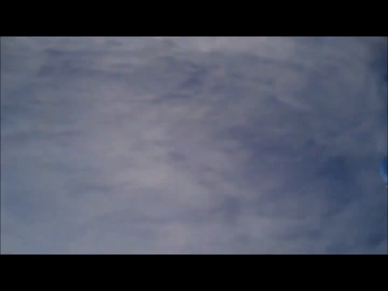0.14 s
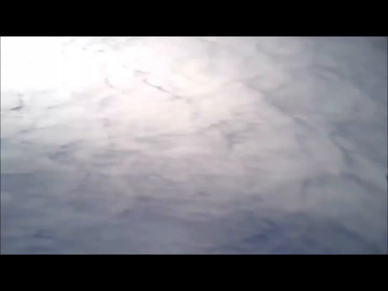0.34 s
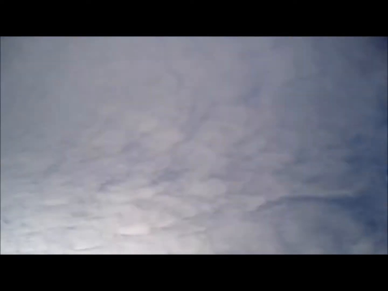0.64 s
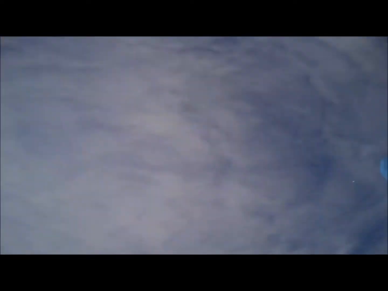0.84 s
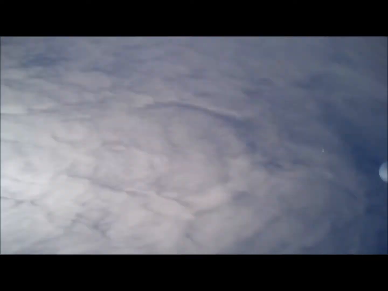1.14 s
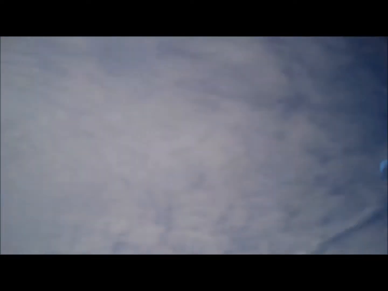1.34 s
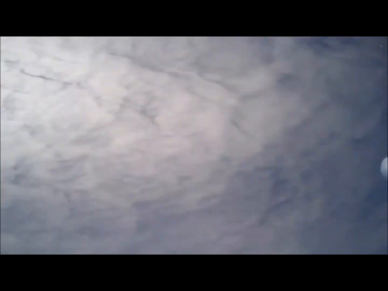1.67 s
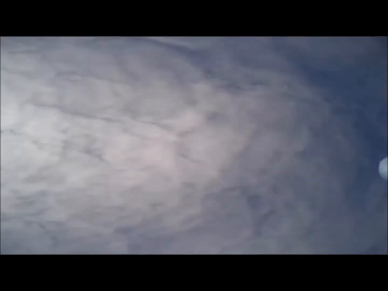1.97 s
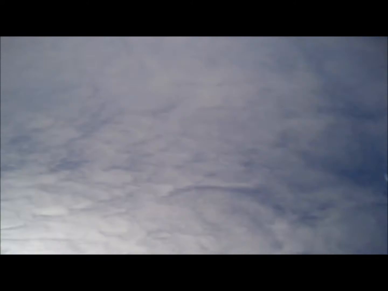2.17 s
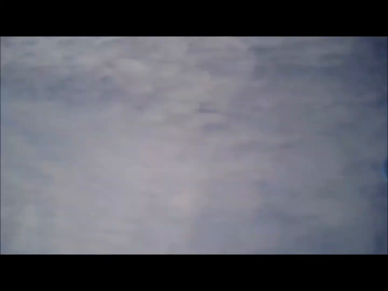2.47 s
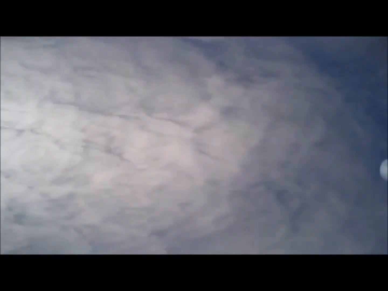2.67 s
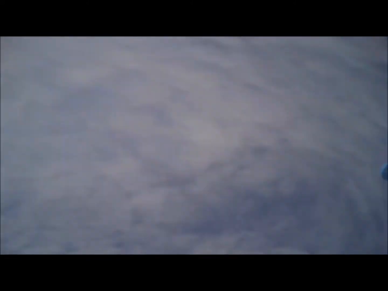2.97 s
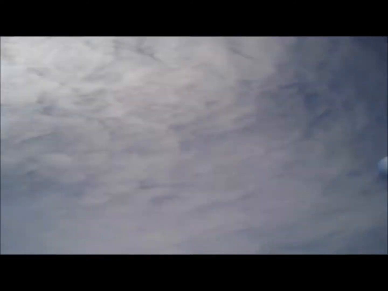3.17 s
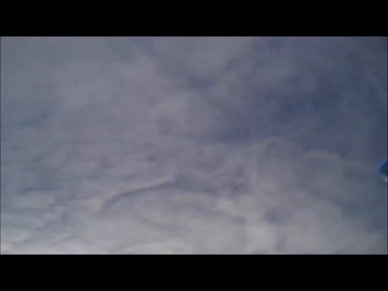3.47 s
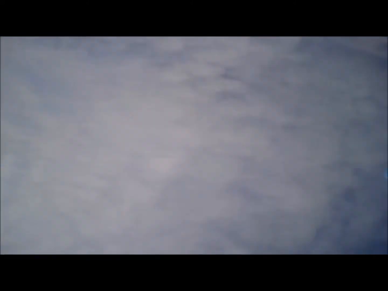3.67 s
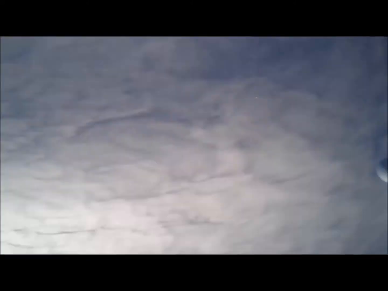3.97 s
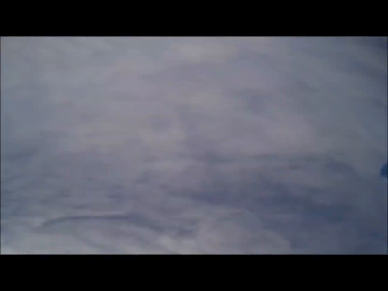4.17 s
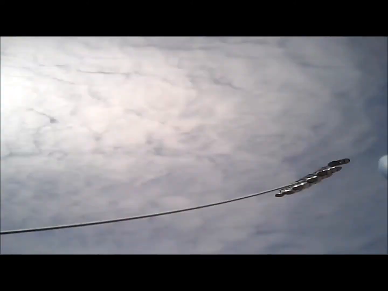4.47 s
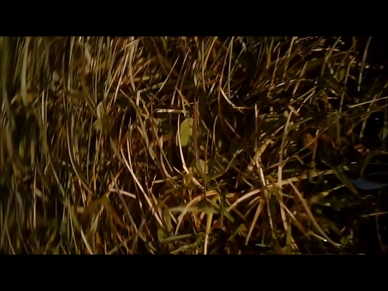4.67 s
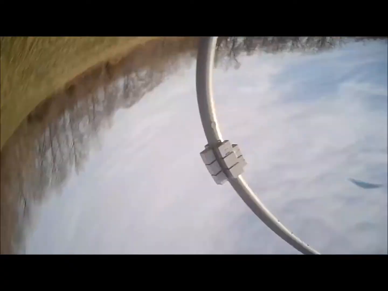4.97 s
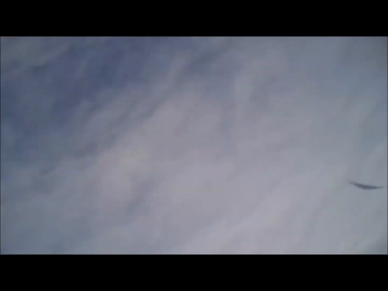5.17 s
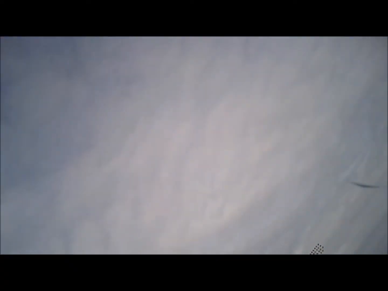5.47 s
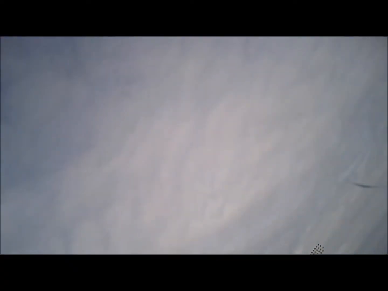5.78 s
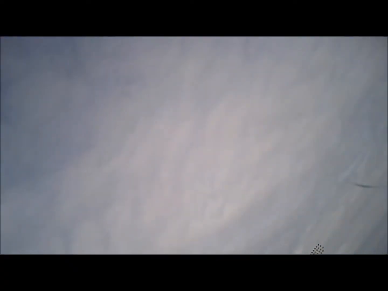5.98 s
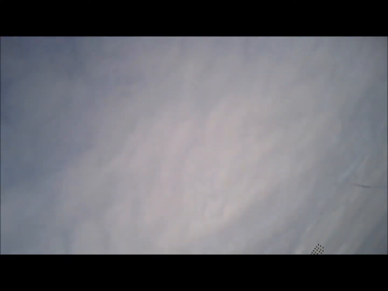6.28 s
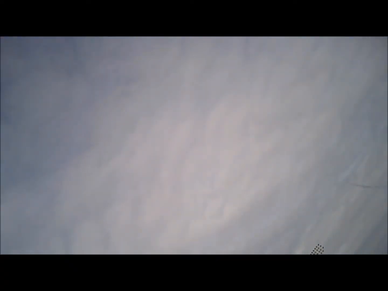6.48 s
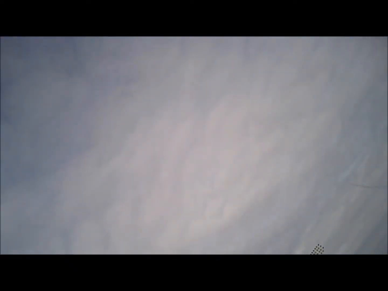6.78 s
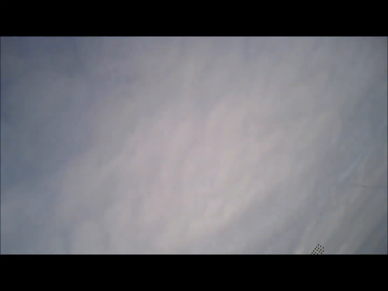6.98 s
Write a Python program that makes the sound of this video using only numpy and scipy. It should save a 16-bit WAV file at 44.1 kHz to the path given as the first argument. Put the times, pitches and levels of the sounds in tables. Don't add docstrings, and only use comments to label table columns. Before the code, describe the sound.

A small camera falls spinning through open air. Deep turbulent wind roars against its microphone, pulsing nearly three times a second with a breathy high swish, gusty slaps and small plastic snaps. At about 4.6 seconds it slams into the ground with a distorted crack, rustles and ticks briefly, bounces once with a sharp clatter, scrapes through dry grass and lies still over faint low rumble and hiss.

```python
import sys
import numpy as np
from scipy import signal
from scipy.fft import rfft, irfft
from scipy.io import wavfile
from scipy.ndimage import uniform_filter1d

SR = 44100
rng = np.random.default_rng(int(sys.argv[2]) if len(sys.argv) > 2 else 0)


def linear_from_db(decibels):
    return 10 ** (np.asarray(decibels, float) / 20)


def int16_out(signal):
    q = np.round(np.clip(np.atleast_2d(signal).T, -1, 1) * 32767)
    wavfile.write(sys.argv[1], SR, q.astype(np.int16))


N = 313992
T = np.arange(N) / SR
HZ = np.maximum(np.fft.rfftfreq(N, 1 / SR), 1)
AIR_STOP_S = 4.636

# (frequency [Hz], width [Hz], level [dB])
HOUSING = [
    [(550, 320, -10), (1184, 380, 3), (1590, 590, -11)],
    [(2500, 700, -7), (3650, 380, 0), (5000, 650, -8)],
    [(6450, 900, -1), (8900, 2200, -8.5), (9550, 760, -5), (12300, 1600, -12), (14600, 1000, -13)],
]
# (edge passes [s], edge level [dB], wake lag [s], wake lift [dB])
TURNS = [(-.02, -48.5, .08, 2), (.355, -45.5, .09, 1.5), (.70, -43.5, .06, 5), (1.075, -45.5, .06, 3),
         (1.445, -45, .09, 5.5), (1.83, -40, .12, 5.5), (2.19, -45, .07, 2.5), (2.57, -44, .05, 3.5),
         (2.94, -44, .08, 3.5), (3.32, -44, .06, 7.5), (3.735, -42.5, .07, 6), (4.15, -45, .04, 7),
         (4.58, -45.5, .04, 3)]


def rms_one(x):
    return x / np.sqrt(np.mean(x ** 2) + 1e-20)


def in_time(rows):
    s, *columns = np.transpose(rows)
    return [np.interp(T, s, c, left=-200, right=-200) for c in columns]


def at_hz(points, hz):
    point_hz, level_db = np.transpose(points)
    return np.interp(np.log(hz), np.log(point_hz), level_db)


def drift(rate):
    r = np.exp(-16 * np.pi * rate / SR)
    slow = signal.lfilter([1], [1, -2 * r, r * r], rng.standard_normal(N // 8 + 4002))[4000:]
    return np.interp(np.arange(N) / 8, np.arange(len(slow)), rms_one(slow))


def bumps(times, heights, half_s, rise_share=1):
    t, total = T[::32], 0
    for s, h, w in zip(times, heights, np.broadcast_to(half_s, len(times))):
        spread = np.where(t < s, rise_share * w, w)
        total = total + h * np.exp(-.5 * ((t - s) / spread) ** 2)
    return np.interp(T, t, total)


def coloured(spectrum, ridges=()):
    lift_db = sum(db / (1 + (2 * (HZ - hz) / width) ** 2) for hz, width, db in ridges)
    return rfft(rng.standard_normal(N)) * linear_from_db(at_hz(spectrum, HZ) + lift_db)


def bands(noise):
    place = np.clip(2 * np.log2(HZ / 25), 0, 18)
    for k in range(19):
        share = np.cos(np.pi / 2 * np.clip(place - k, -1, 1)) ** 2
        yield 25 * 2 ** (k / 2), irfft(noise * share, N)


def resonate(x, peaks):
    out = 0
    for k, (hz, width, level_db) in enumerate(peaks):
        r = np.exp(-np.pi * width / SR)
        a = [1, -2 * r * np.cos(2 * np.pi * hz / SR), r * r]
        out = out + (-1) ** k * linear_from_db(level_db) * signal.lfilter([1 - r * r, 0, r * r - 1], a, x + 1e-18)
    return out


def housing(drives, contact):
    body, shell, thin = [resonate(drive * contact, modes) for drive, modes in zip(drives, HOUSING)]
    middle = signal.butter(2, [450, 3000], "band", fs=SR, output="sos")
    return signal.sosfilt(middle, body) + shell + thin


def sharpen(x, widen, level_db):
    modes = [(hz, widen * width, level_db) for group in HOUSING for hz, width, _ in group]
    return resonate(x, modes[1:])


def by_group(rows, thin_db, fading=0):
    thin_follows = 0.34
    return [(s, db + hard / 2, db - hard / 2, db + thin_db + thin_follows * hard + fading * max(s - 5.3, 0))
            for s, db, hard in rows]


def grains(per_s, spread_db):
    sizes = linear_from_db(spread_db * np.minimum(rng.exponential(1, N), 5)) * rng.choice([-1, 1], N)
    return rms_one(sizes * (rng.random(N) < per_s / SR))


def snaps(table, shell_db, body_db, thin_db):
    drives, rows = np.zeros((3, N)), np.array(table)
    at = np.round(rows[:, 0] * SR).astype(int)
    drives[:, at] = -linear_from_db(rows[:, [2, 1, 3]].T + np.array([[body_db], [shell_db], [thin_db]]))
    return housing(drives, 0.64)


def turn_cos(lag):
    return np.cos(2 * np.pi * (np.interp(T, np.array(TURNS)[:, 0], range(len(TURNS))) - lag))


def edge_level():
    quiet_db, swell_db, pass_s = -55.5, 3.0, .024
    s, level_db = np.transpose(TURNS)[:2]
    return quiet_db + swell_db * turn_cos(-0.055) + bumps(s, level_db - quiet_db - swell_db, pass_s)


def swings():
    # (time [s], lift [dB], half length [s])
    gusts = [(0.296, 8, .022), (0.645, 7, 0.024), (1.01, 2, .05), (1.406, 3.5, .04), (1.844, 14.5, 0.021),
             (2.15, 2, .03), (2.485, 3, .04), (2.854, 4, .04), (3.253, 4, 0.054), (3.677, 4.5, .04),
             (4.082, 7, .03), (4.519, 6.5, 0.029)]
    # (share of gust [1], share of wake [1], swing with the turn [dB], its lag [turns])
    answers = [
        (.1, 0.88, 0.7, .1),
        (0.88, 0.86, 0.5, 0.14),
        (0.7, .05, 1.52, -0.24),
        (0.86, .25, -0.6, -0.22),
        (.3, .05, 1, -0.24),
    ]
    wake_s, gust_rise_share = 0.05, 0.67
    speeding_db_per_s = 0.28
    s, _, lag, wake_db = np.transpose(TURNS)
    gust = bumps(*np.transpose(gusts), gust_rise_share)
    wake = bumps(s + lag, wake_db, wake_s)
    lifts = [a * gust + b * wake + swing_db * turn_cos(late) + speeding_db_per_s * T * k / 4
             for k, (a, b, swing_db, late) in enumerate(answers)]
    return [c - c[T < AIR_STOP_S].mean() for c in lifts]


def airflow(eddy_db=1.5, own_db=0.5, suction=.15):
    layer_hz = [110, 290, 950, 4000, 12000]
    # (frequency [Hz], level [dB per Hz])
    colour = [(15, -33), (25, -2.5), (59, -2), (284, 1.5), (623, -2), (1130, -7), (2100, -23), (3710, -24),
              (6710, -31.5), (7690, -36), (13900, -46.5), (15900, -52)]
    # (frequency [Hz], width [Hz], lift [dB])
    ridges = [(2480, 430, 1), (3660, 650, 5), (5060, 500, 3.5), (6770, 660, 4.5), (8800, 700, 4.5),
              (10600, 1100, 4), (14480, 1300, 7)]
    air_db, fade_s = -15, .006
    swing = swings()
    swing[4] = swing[4] + .2 * (np.clip(edge_level(), -60, -46) + 52.5)
    eddies = eddy_db * (0.71 * drift(62) + 0.55 * drift(54))
    flicker = [drift(30) for k in range(4)]
    out = 0
    for k, (hz, band) in enumerate(bands(coloured(colour, ridges))):
        place = np.interp(np.log(hz), np.log(layer_hz), range(5))
        low = min(int(place), 3)
        gust_db = swing[low] + (place - low) * (swing[low + 1] - swing[low])
        share = np.clip(hz / 300, 0, 1)
        out = out + band * linear_from_db(gust_db + share * eddies + own_db * flicker[k % 4])
    air = out / np.sqrt(np.mean(out[T < 4.6] ** 2)) * linear_from_db(air_db)
    air = air - suction * (air ** 2 - linear_from_db(2 * air_db))
    return air / (1 + np.exp(np.clip((T - AIR_STOP_S) / fade_s, -50, 50)))


def bursting():
    buffet_db = np.where(T < AIR_STOP_S, swings()[2], -200)
    born = rng.random(N) < 300 * linear_from_db(buffet_db) / SR
    spikes = -linear_from_db(2.5 * np.minimum(rng.exponential(1, N), 3)) * born
    soft = signal.sosfilt(signal.butter(2, [150, 750], "band", fs=SR, output="sos"), spikes + 1e-18)
    return linear_from_db(-28.5 + .5 * buffet_db) * rms_one(soft)


def edge():
    centre_hz, sweep_hz, width_hz, rise_hz_per_s = 12400, 650, 550, 170
    level_db = np.where(T < AIR_STOP_S, edge_level(), -200)
    slope = uniform_filter1d(np.gradient(np.maximum(level_db, -60)), size=1200) * SR
    turning = np.tanh(slope / 60)
    phase = 2 * np.pi * np.cumsum(centre_hz + rise_hz_per_s * (T - 2) + sweep_hz * turning) / SR
    breath = signal.sosfilt(signal.butter(2, width_hz, fs=SR, output="sos"), rng.standard_normal((2, N)))
    whistle = rms_one(breath[0] * np.cos(phase) + breath[1] * np.sin(phase))
    excess = np.maximum(linear_from_db(2 * np.minimum(level_db, -44)) - linear_from_db(2 * -51.0), 0)
    return whistle * np.sqrt(excess) * linear_from_db(-2.5)


def field():
    # (frequency [Hz], level [dB per Hz])
    colour = [(15, -43.5), (25, -8.5), (48, -13), (87, -3.5), (108, -8.5), (175, -10.5), (217, -16.5),
              (277, -17.5), (838, -23), (1360, -27), (13900, -38.5), (15900, -43.5)]
    field_db, hum_db = -47, -57
    after_db, hold_db, after_s = 8, 1.5, 0.1
    landed_s, hush_db, recover_s = 5.16, -4, .4
    hum = rms_one(resonate(rng.standard_normal(N), [(86, 12, 0)]))
    noise = coloured(colour, [(14700, 1500, 5)])
    whole = irfft(noise, N)
    deep = irfft(noise / (1 + (HZ / 260) ** 4), N)
    before_db = hold_db + after_db * np.exp(-abs(T - AIR_STOP_S) / after_s)
    later_db = hush_db * np.exp(-abs(T - landed_s) / recover_s)
    swell = linear_from_db(np.where(T < landed_s, before_db, later_db))
    return linear_from_db(field_db) * (whole + deep * (swell - 1)) / whole.std() + linear_from_db(hum_db) * hum * swell


def flexing():
    # (time [s], level [dB], hardness as shell over body [dB])
    gust_snaps = [(.2499, -11, 2), (.2554, -12, -2), (.2669, -14, 10), (.2864, -22, 6), (.2979, -3, -8),
                  (.3059, -10, 9), (.618, -16, -9), (.6244, -6, -11), (.6414, -9, 0), (.6474, -6, -6),
                  (.9048, -18, -10), (.9373, -9, -2), (1.8104, -18, -1), (1.8213, -3, -2), (1.8324, -6, 9),
                  (1.8402, -7, 15), (1.8474, -18, -10), (1.8564, -15, 2), (1.8634, -10, 4),
                  (2.1066, -13.5, 9), (2.1434, -16, 2), (2.4813, -14, 3), (2.7691, -8.5, -2),
                  (2.9048, -11, 0), (3.2151, -10, -4), (3.6581, -11.5, 9), (4.0512, -7, -1)]
    # (time [s], level [dB])
    cracks = [(.3059, 3.5), (.2979, -10), (1.8402, -4), (1.8474, 1), (2.1066, -12), (2.4813, -12),
              (5.1308, -4), (5.1342, 4), (5.1954, -9), (5.407, -26)]
    dull = snaps(by_group(gust_snaps, -13), shell_db=18.0, body_db=14.0, thin_db=18.0)
    s, level_db = np.transpose(cracks)
    clicks = np.zeros(N)
    clicks[np.round(s * SR).astype(int)] = linear_from_db(level_db)
    soft = signal.butter(2, 6500, fs=SR, output="sos")
    return signal.sosfilt(soft, dull) + resonate(clicks, HOUSING[2][:4])


def whumps():
    # (time [s], level [dB], pitch [Hz], half length [s])
    locked = [(.298, -10.5, 260, 0.016), (.645, -12, 308, .008), (.72, -18, 210, 0.013),
              (.79, -14, 190, 0.016), (1.47, -17, 200, 0.012), (1.56, -17, 150, .02),
              (1.865, -13, 250, .012), (1.97, -12, 193, 0.013), (2.62, -16.5, 170, 0.018),
              (3.39, -16.5, 167, .015), (3.77, -17, 242, .015), (3.84, -15, 185, 0.01),
              (4.17, -10, 228, 0.0078)]
    s, level_db, hz, half = np.transpose(locked)
    nearest = np.searchsorted((s[1:] + s[:-1]) / 2, T)
    phase = 2 * np.pi * hz[nearest] * (T - s[nearest]) + .8 * drift(25)
    return bumps(s, linear_from_db(level_db), half) * np.sin(phase)


def blows(table, shell_db, body_db, thin_db, rise_s):
    drives, since = np.zeros((3, N)), np.arange(3000) / SR
    for s, shell, body, thin, t60 in table:
        at = round(s * SR)
        shape = linear_from_db(-60 * since / max(t60, .001)) * (1 - np.exp(-since / rise_s))
        levels_db = np.array([[body + body_db], [shell + shell_db], [thin + thin_db]])
        drives[:, at:at + len(since)] += linear_from_db(levels_db) * shape
    return housing(drives, grains(16000, 2.5))


def collisions():
    # (time [s], shell [dB], body [dB], thin parts [dB], 60 dB decay [s])
    impact = [
        (4.6132, 18, -5.5, -6.5, 0.034),
        (4.6175, 9, 5.5, -3, 0.0086),
        (4.6205, 6, 12.5, 7.5, 0.017),
        (4.626, 3.5, 8, -9, 0.019),
    ]
    # (time [s], level [dB], hardness as shell over body [dB])
    later = [(4.6318, 0, -12), (4.6374, -6.5, 7), (4.6418, -9, -1), (4.6473, -10.5, 4.5),
             (4.6504, -15, -4.5), (4.6564, -16, -6), (4.6651, -26.5, -2.5), (4.6782, -24.5, 3.5),
             (4.6892, -27.5, 12), (5.1305, -18, 11), (5.1341, -1.5, 7), (5.1417, -13.5, 22.5),
             (5.1433, -5, 17), (5.1484, -8, 6.5), (5.1524, -16.5, 9), (5.1692, -22.5, 9), (5.1844, -28, 14),
             (5.2676, -11, 4), (5.2769, -14.5, -4), (5.2798, -4.5, 16.5), (5.2824, -14, -5.5),
             (5.3582, -27.5, 23), (5.3962, -30, 1), (5.4834, -43, 1)]
    t60_s, hard_shorter_db = .015, 0.29
    rows = [row + (t60_s * linear_from_db(hard_shorter_db * (row[2] - row[1])),) for row in by_group(later, -11.5)]
    return blows(impact + rows, shell_db=5.0, body_db=13.5, thin_db=10.5, rise_s=0.00023)


def thumps():
    # (time [s], height [full scale], length [s])
    pushes = [
        (4.7, -0.019, .12),
        (5.14, -0.046, 0.01),
        (5.1445, 0.11, 0.0018),
        (5.157, -0.091, 0.011),
    ]
    push_s, push_height, length_s, rebound_s, loss_db = 4.617, -1.3, .0021, 0.0044, 2.5
    rebounds = [(push_s + rebound_s * k, push_height * (-1) ** k * linear_from_db(-loss_db * k), length_s)
                for k in range(6)]
    return sum(height * np.sin(np.pi * np.clip((T - s) / length, 0, 1))
               for s, height, length in rebounds + pushes)


def grass():
    # (time [s], pressure as level [dB], hardness [dB])
    slides = [
        [(4.655, -28.5, -15.5), (4.70, -39.5, -0.5), (4.705, -51, -4), (4.76, -53, 4)],
        [(5.153, -27, 5), (5.175, -40.5, 3), (5.204, -37, 0)],
        [(5.204, -42, -3), (5.22, -38.5, 4.5), (5.262, -25, -5), (5.29, -24.5, 3), (5.31, -26.5, -3.5),
         (5.42, -39, -3), (5.445, -44, -5), (5.45, -51, -4), (5.5, -60, 0)],
    ]
    # (frequency [Hz], width [Hz], level [dB])
    rings = [(1460, 285, -7.5), (3700, 350, -6.5), (6740, 800, -9.5)]
    thin_db, dulls_db_per_s = -5, -40
    stalks = grains(5000, 3.0) * linear_from_db(1.5 * drift(80))
    stalks = signal.lfilter([1], [1, -.45], stalks)
    drives = 0
    for rows in slides:
        shell, body, thin = linear_from_db(in_time(by_group(rows, thin_db, dulls_db_per_s)))
        drives = drives + np.array([body, shell, thin])
    rubbed = housing(linear_from_db(3.5) * drives, stalks)
    favoured = sum(resonate(rubbed, [peak]) for peak in rings)
    light = signal.butter(4, 1000, "high", fs=SR, output="sos")
    return signal.sosfilt(light, linear_from_db(-3.0) * (rubbed + favoured))


def wire():
    # (time [s], level [dB])
    quiver = [
        (4.7, -47),
        (4.78, -44),
        (4.918, -55.5),
        (4.95, -71),
    ]
    # (frequency [Hz], width [Hz], level [dB])
    rings = [(2500, 360, -5), (3950, 330, -5.5), (6840, 1600, -6), (10200, 970, -8), (14250, 770, -1.5)]
    first_s, period_s = 4.7064, .0099
    level_db, = in_time(quiver)
    beats = first_s + period_s * np.arange(25)
    chance = rng.standard_normal((25, 2))
    between = beats + .0055 + .0015 * chance[:, 1]
    at = np.round(np.r_[beats + .0002 * chance[:, 0], between] * SR).astype(int)
    strength_db = np.r_[np.zeros(25), -7.0 - 120 * np.maximum(beats - 4.8, 0)]
    out = 0
    for ring in rings:
        struck = np.zeros(N)
        struck[at] = linear_from_db(strength_db + level_db[at] + 26.0 + 3.0 * rng.standard_normal(50))
        out = out + resonate(resonate(struck, [ring]), [(ring[0], 3 * ring[1], 0)])
    return out


def ticks():
    # (time [s], shell [dB], body [dB], thin parts [dB])
    stalks = [(5.0913, -44, -42, -40), (5.1954, -28, -28, -40), (5.239, -31, -21, -27),
              (5.407, -20, -32, -44), (5.445, -29, -46, -55), (5.4764, -34, -42, -56),
              (5.5044, -36, -57, -61), (5.7016, -29.5, -28, -55), (6.7622, -25, -52.5, -38)]
    hard = snaps(stalks, shell_db=20.0, body_db=16.5, thin_db=24.0)
    return signal.sosfilt(signal.butter(2, 8500, fs=SR, output="sos"), sharpen(hard, 1, -2.4))


def writes():
    starts = [5.44, 6.4]
    # (multiple of the clock [1], level [dB rms])
    orders = [(14, -68), (15, -64), (16, -65), (17, -74), (18, -72)]
    clock_hz = 699.7
    comb = sum(np.sqrt(2) * linear_from_db(level_db) * np.sin(2 * np.pi * round(k) * clock_hz * T + k * k)
               for k, level_db in orders)
    blip = linear_from_db(-52.0) * (np.sin(2 * np.pi * 11400 * T) + 0.75 * np.sin(2 * np.pi * 10700 * T))
    out = 0
    for s in starts:
        out = out + comb * ((T > s) & (T < s + .05))
        out = out + blip * sum(np.exp(-((T - s - lag) / 0.0021) ** 2) for lag in (-.01, .062))
    return out


def scene():
    fall = airflow() + bursting() + edge() + flexing() + whumps()
    landing = collisions() + thumps() + grass() + wire()
    rest = field() + ticks() + writes()
    return (fall + landing + rest)[None]


def top_cut(x):
    return signal.sosfilt(signal.butter(12, 16090, fs=SR, output="sos"), x)


def record(dry):
    offset, cutoff_hz = .0108, 15900
    clipped = np.clip(dry + offset, -.98, .98)
    cut = signal.sosfilt(signal.cheby2(32, 70, cutoff_hz, fs=SR, output="sos"), clipped)
    return top_cut(cut)


dry = scene()
out = record(dry)
int16_out(out)
```